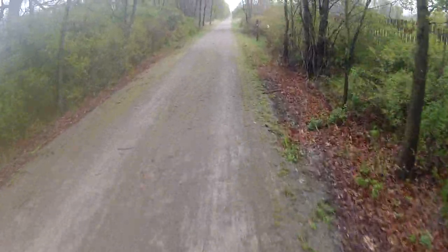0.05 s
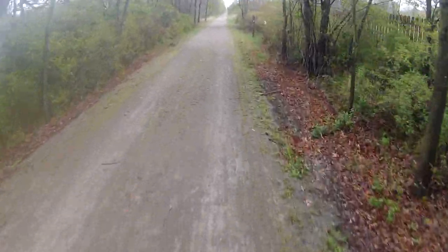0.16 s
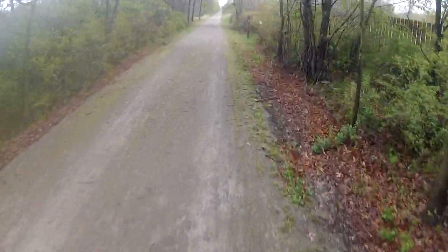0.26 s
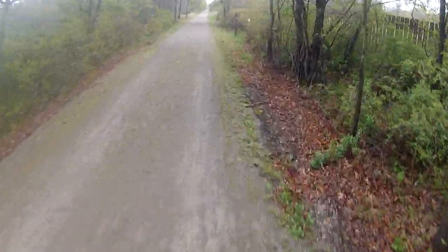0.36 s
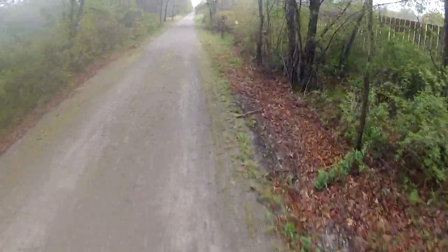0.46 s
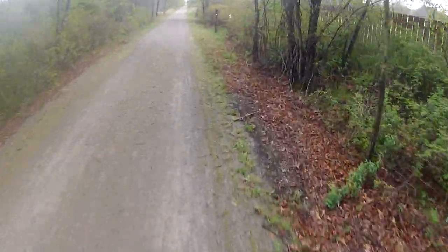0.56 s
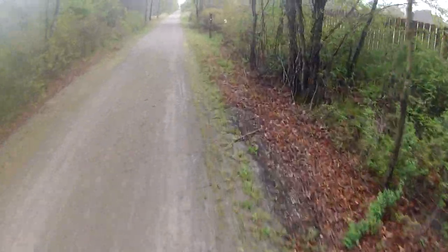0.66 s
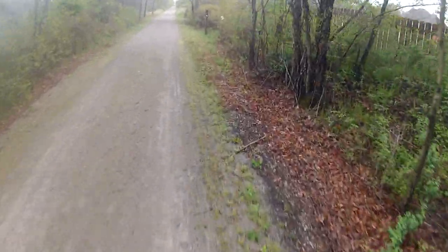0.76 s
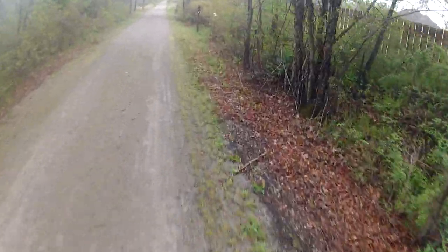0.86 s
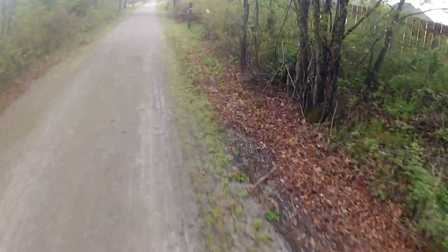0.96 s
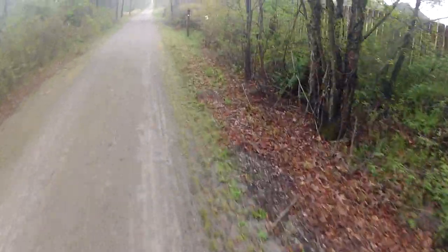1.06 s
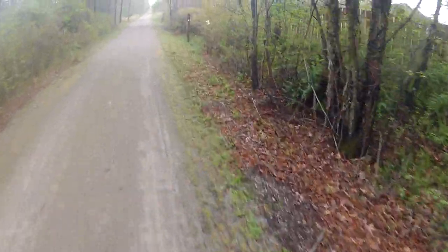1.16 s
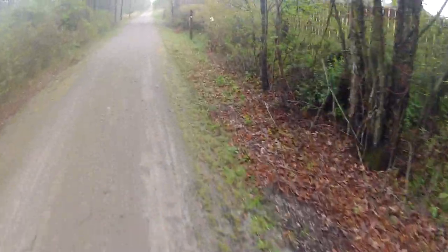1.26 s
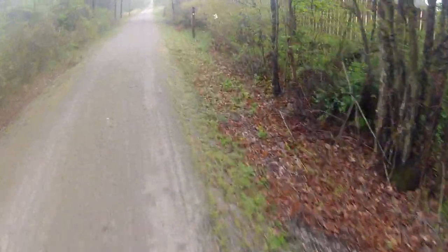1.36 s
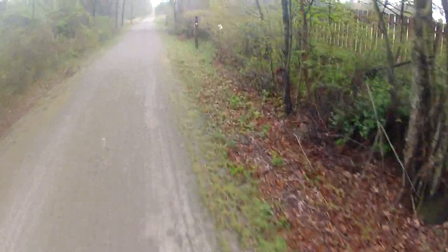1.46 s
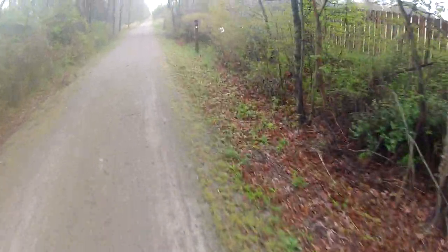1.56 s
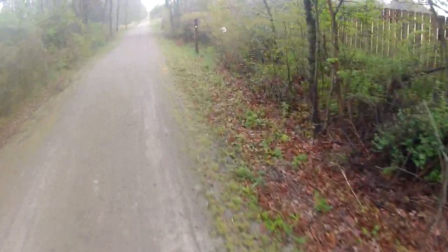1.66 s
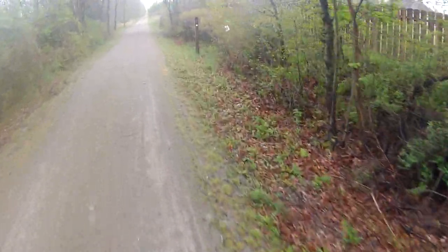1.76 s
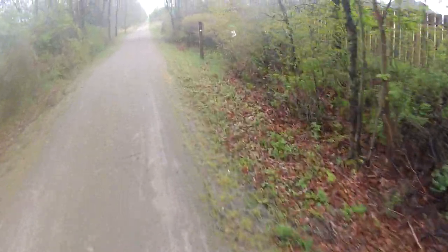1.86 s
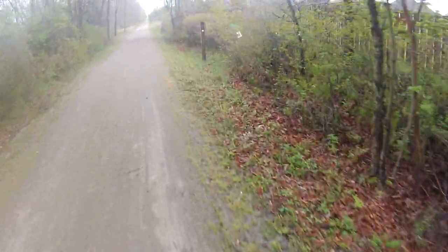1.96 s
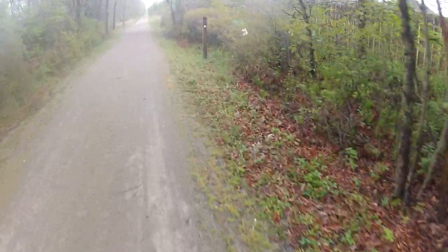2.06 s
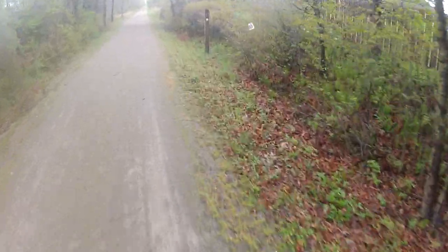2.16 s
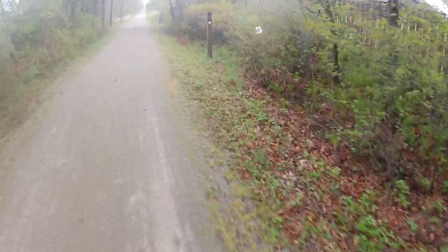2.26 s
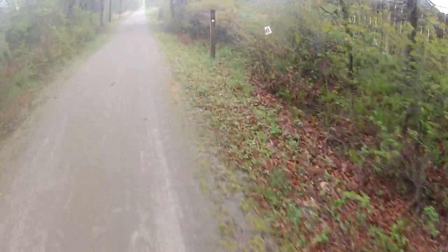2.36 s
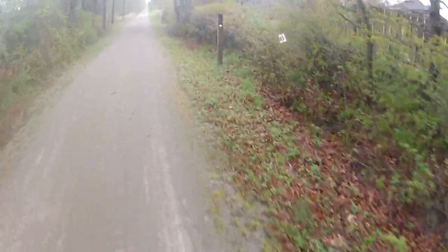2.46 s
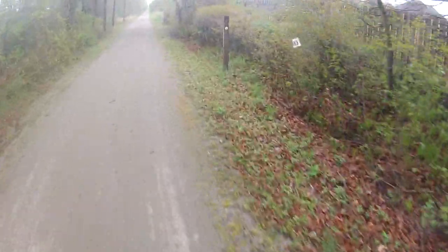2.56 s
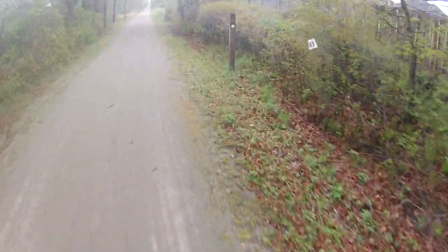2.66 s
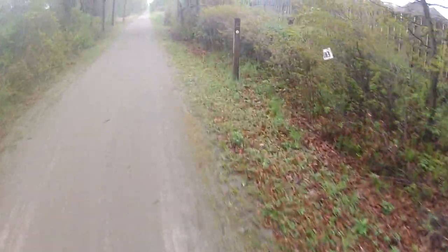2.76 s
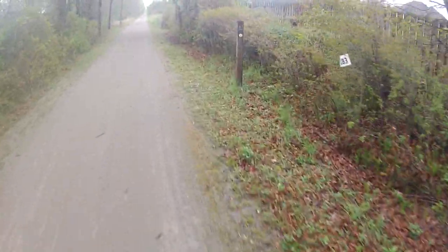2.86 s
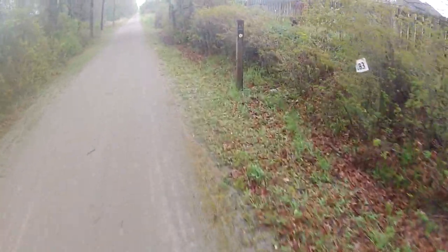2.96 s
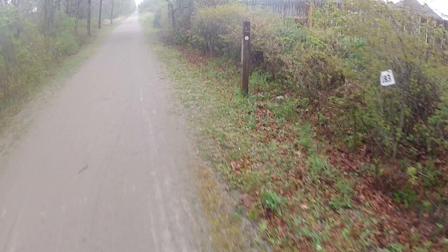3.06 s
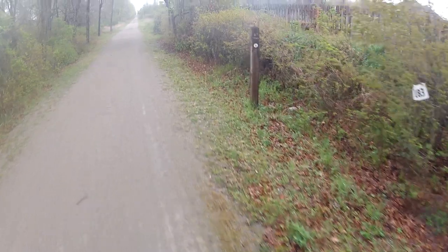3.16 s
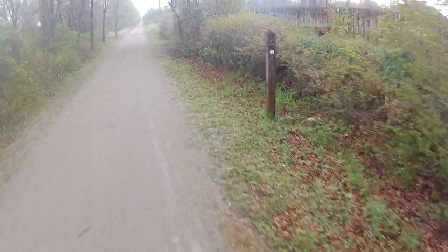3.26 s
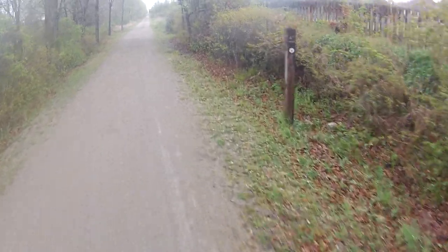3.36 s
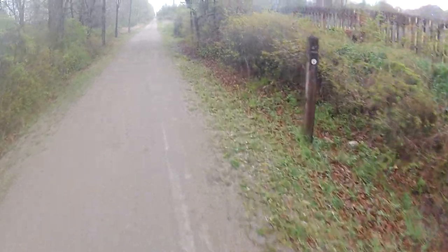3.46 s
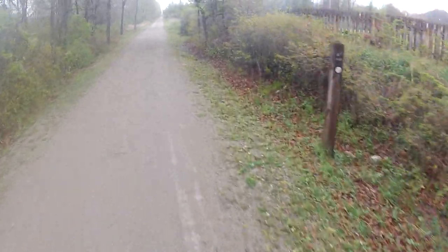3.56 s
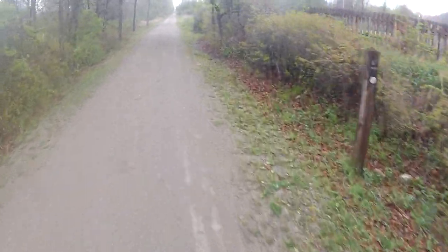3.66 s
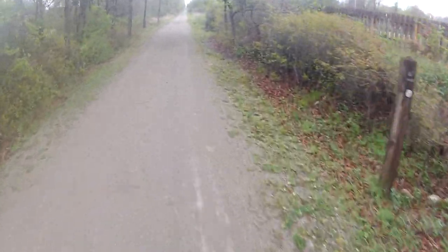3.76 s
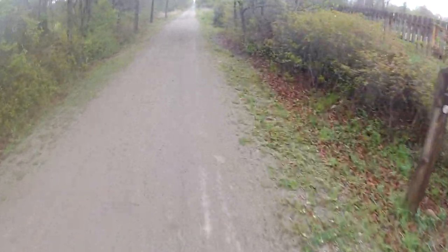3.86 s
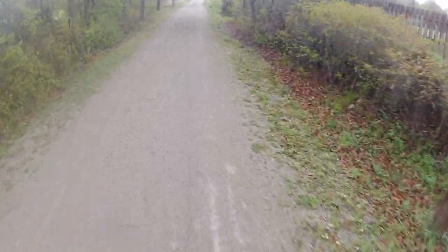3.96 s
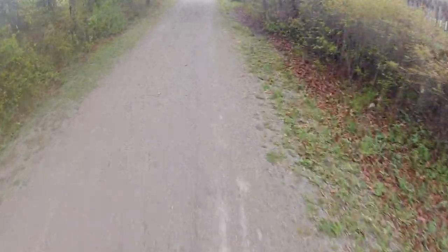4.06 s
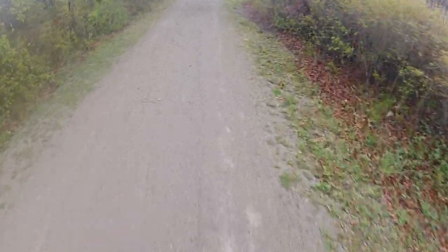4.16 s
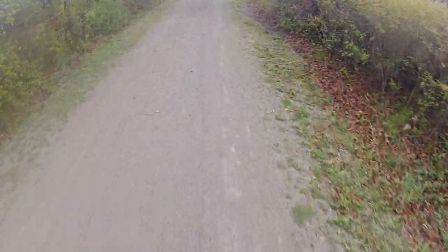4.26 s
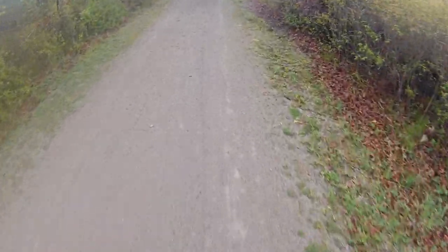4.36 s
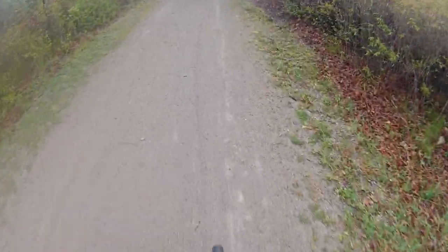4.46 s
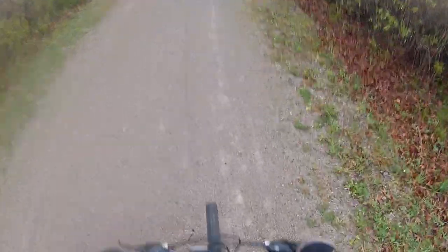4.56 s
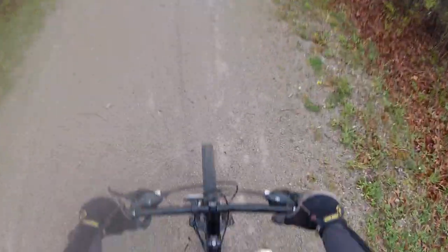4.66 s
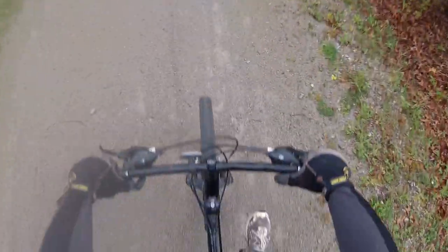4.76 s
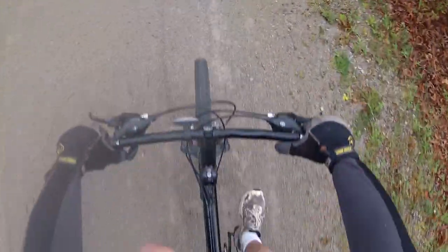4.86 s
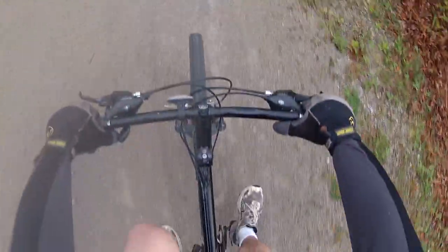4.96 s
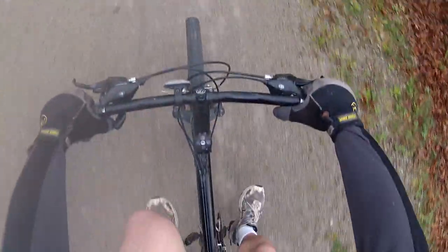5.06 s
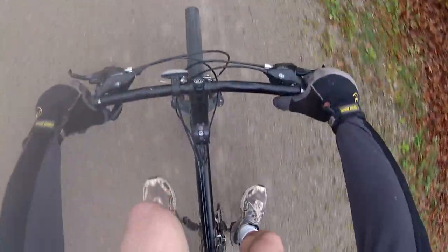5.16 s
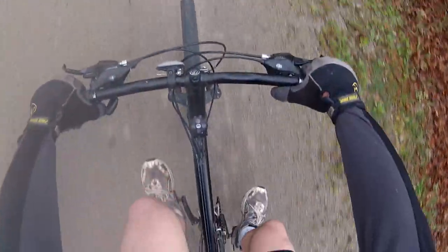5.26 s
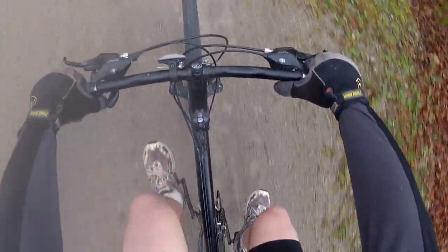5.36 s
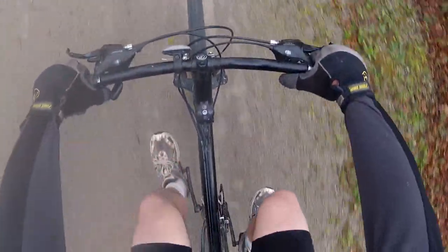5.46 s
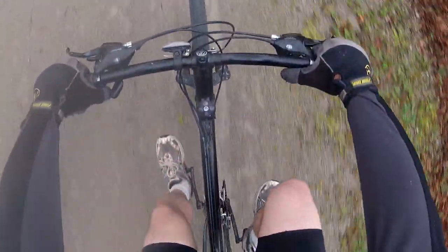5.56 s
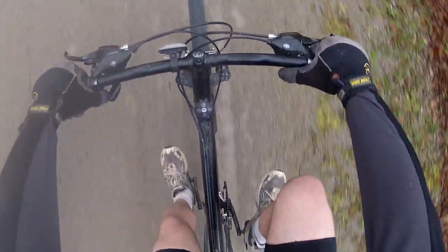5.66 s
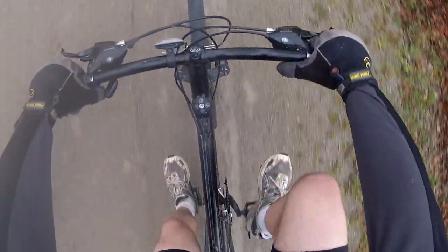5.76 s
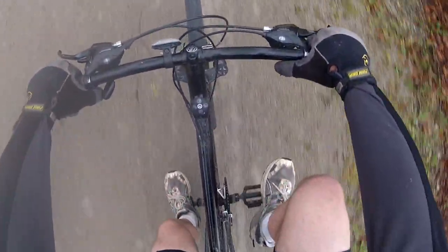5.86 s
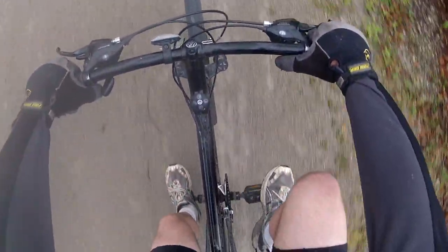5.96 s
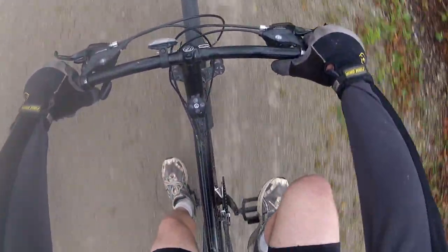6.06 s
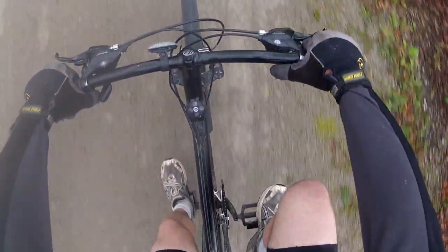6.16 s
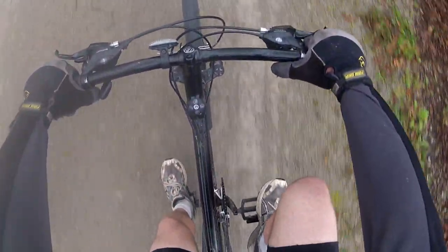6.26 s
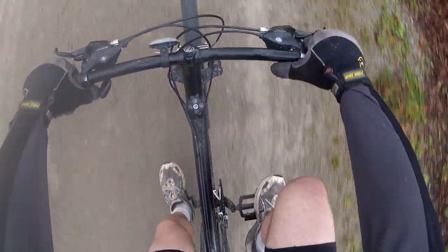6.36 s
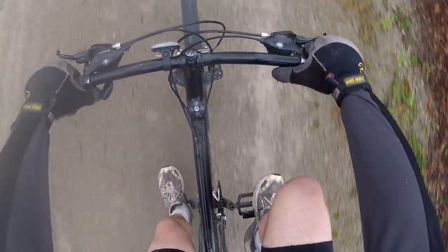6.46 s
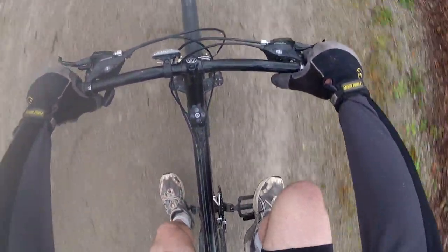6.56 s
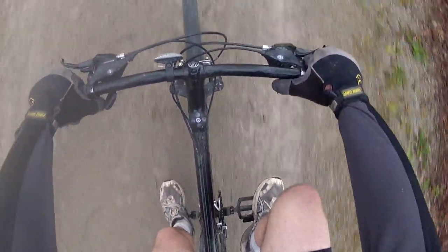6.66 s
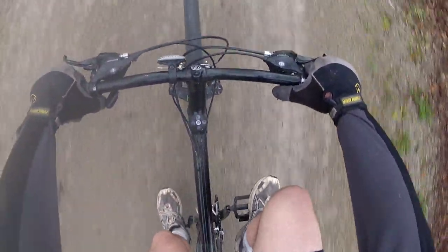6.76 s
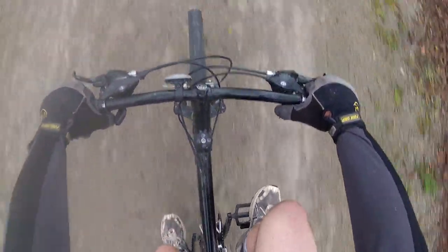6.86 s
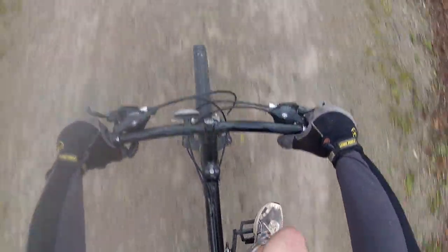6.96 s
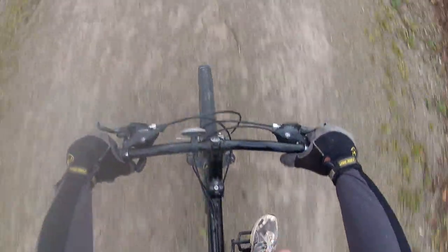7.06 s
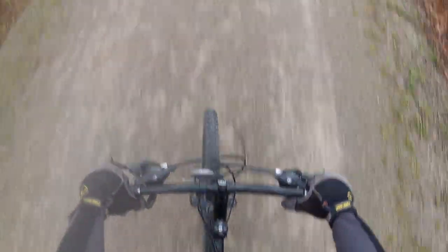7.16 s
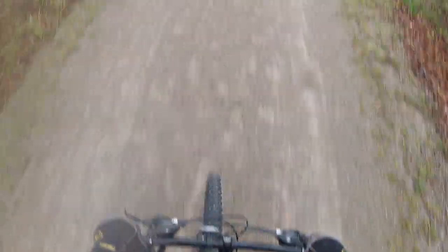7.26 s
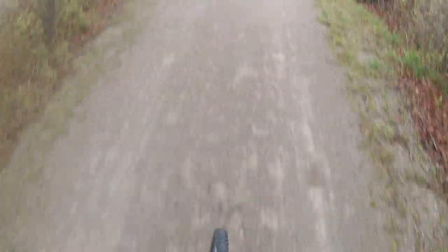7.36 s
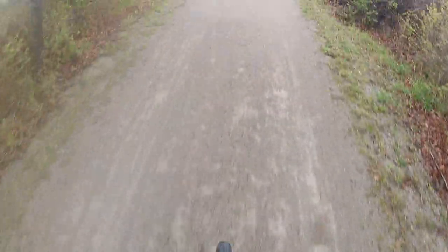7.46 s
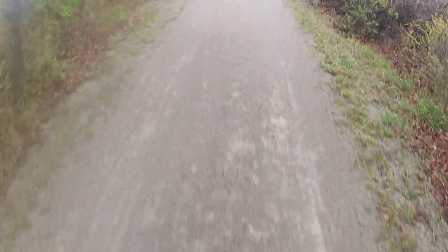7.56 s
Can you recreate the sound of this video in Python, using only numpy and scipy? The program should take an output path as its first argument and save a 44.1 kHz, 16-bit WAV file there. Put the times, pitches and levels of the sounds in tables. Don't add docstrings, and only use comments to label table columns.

```python
import sys
import numpy as np
from scipy import signal
from scipy.fft import rfft, irfft, next_fast_len
from scipy.io import wavfile
from scipy.ndimage import uniform_filter1d

SR = 44100
rng = np.random.default_rng(int(sys.argv[2]) if len(sys.argv) > 2 else 0)


def magnitude_from_level(level_db):
    exponent = np.asarray(level_db, float) / 20
    return 10 ** exponent


def wrap_up_sound(samples):
    columns = np.atleast_2d(samples).T
    tamed = np.clip(columns, -1, 1)
    steps = np.round(tamed * 32767).astype(np.int16)
    wavfile.write(sys.argv[1], SR, steps)


N = 335595

# t/s, head tilt/0-1, gravel coarseness level/dB
RIDE = [(0, 0.03, -0.5), (0.6, 0.07, 1.5), (1.6, 0.1, -1), (2.07, 0, 4.5), (2.3, 0.14, 0), (2.8, 0.16, 1),
        (3.2, 0.2, -2), (3.94, 0.17, 1), (4.38, 0.3, 0), (4.72, 0.19, 1), (5.1, 0.6, 1), (5.5, 0.67, -1.5),
        (6.0, 1, -1), (6.5, .97, 1.5), (6.77, 0.9, -0.5), (7.05, 0.82, 0.5), (7.4, 0.58, -1),
        (7.61, 0.44, 0.5)]
OPEN_AHEAD, OPEN_TILT = 0.33, 0.82
TIPS_AT_S = 4.5

# peak t/s, level/dB, length/s
GUSTS = [(0.25, -59, 0.49), (1.0, -56, 0.18), (1.303, -51, 0.13), (1.87, -55, 0.35), (2.21, -47.5, 0.2),
         (2.464, -42, 0.18), (2.75, -49, 0.35), (3.053, -49, 0.25), (3.265, -54, 0.14), (3.43, -52, 0.12),
         (3.706, -46.5, 0.12), (3.82, -55, 0.2), (4.203, -47.5, .24), (4.705, -44, 0.25),
         (4.814, -37.5, 0.086), (4.935, -38.5, 0.18), (5.05, -41.5, .12), (5.306, -44.5, 0.36),
         (5.465, -45.5, 0.13), (5.677, -43, 0.35), (5.85, -52, 0.065), (6.04, -42.5, 0.18),
         (6.27, -40, 0.36), (6.507, -40, 0.065), (6.626, -37.5, .18), (6.856, -36, 0.2),
         (6.944, -37.5, 0.11), (7.078, -37.5, 0.16), (7.219, -35.5, .2), (7.427, -43.5, 0.15)]
CALM_DB, CALM_TILT_DB = -57.5, 9.5
# f/Hz, level/dB per Hz
BUFFET_AHEAD = [(4.7, -37), (8.0, -7), (27, 3.5), (44, -3.5), (52, -4.5), (62, -10.5), (78, -28),
                (92, -36.5), (130, -36), (170, -57), (290, -120)]
# f/Hz, level/dB per Hz
BUFFET_BELOW = [(8, -15), (22, -5), (32, -1.5), (40, 2.5), (52, -6), (66, -11), (80, -26.5), (130, -30)]
# f/Hz, level/dB per Hz
WASH = [(44, -37.5), (75, 0), (86, 0.5), (123, -3.5), (232, -1.5), (335, -6.5), (362, -8.5), (431, -9),
        (600, -15.5), (780, -34), (1320, -120)]
WASH_DB = -59.5
# f/Hz, level/dB per Hz
HUM_AHEAD = [(360, -52.5), (620, -21.5), (719, -4.5), (751, -1), (941, -8), (1140, -15), (1250, -15),
             (1750, -21), (2280, -30), (3850, -120)]
# f/Hz, level/dB per Hz
HUM_BELOW = [(360, -24.5), (620, -4.5), (848, 2), (916, -2.5), (970, 2), (1120, -3.5), (1460, -15.5),
             (1600, -11.5), (1750, -15.5), (2280, -66.5), (3850, -120)]
HUM_DB, HUM_TILT_DB = -54, -17.5
HUM_LAG = 4.5

# f/Hz, level/dB per Hz
CRUNCH_AHEAD = [(1000, -32.5), (1700, -17), (1790, -4.5), (1970, 1), (2180, 3.5), (2320, -1), (2610, -10.5),
                (2880, -13), (3630, -14.5), (3950, -16.5), (4210, -16.5), (5260, -20.5), (6000, -27),
                (7800, -63), (13200, -120)]
# f/Hz, level/dB per Hz
CRUNCH_BELOW = [(650, -21.5), (1100, -14.5), (1210, -19), (1540, -8.5), (1720, -11), (1970, -5), (2140, 1),
                (2540, -14), (2930, -3.5), (3280, -7), (3550, -4), (3700, -10.5), (4650, -14), (5240, -14),
                (6000, -24.5), (7800, -72), (13200, -120)]
CRUNCH_DB = -64.5
# low f/Hz, high f/Hz
GRAIN_BANDS = [
    (900, 2260),
    (2500, 3900),
    (3800, 5900),
]

# t/s, energy level/dB, centre f/Hz, spread/octaves
STONES = [(0.4225, -46.5, 2800, 0.26), (0.6815, -51, 2750, 0.33), (1.0896, -49, 3780, 0.28),
          (1.1888, -41, 3250, 0.35), (1.2069, -46, 3060, .35), (1.5624, -47.5, 3190, 0.44),
          (1.9231, -44, 3680, 0.44), (2.524, -47, 2700, .38), (2.5562, -42, 3270, 0.23),
          (3.3112, -45.5, 2330, 0.36), (4.0201, -42.5, 2940, 0.42), (4.2806, -48.5, 2470, .3),
          (4.5346, -45, 3120, 0.41), (4.8552, -41.5, 2440, 1.1), (4.864, -49, 3400, 0.51),
          (4.964, -49.5, 1690, 0.82), (5.0752, -51, 2470, 0.59), (5.2755, -41, 2450, 0.48),
          (5.3255, -48, 4030, 0.63), (5.4424, -45, 3200, 0.27), (5.4736, -40.5, 3120, .49),
          (5.7993, -48, 3140, .35), (6.2482, -47, 3540, 0.35), (6.343, -42.5, 3150, 0.37),
          (6.423, -46, 2400, .24), (6.5729, -48, 1510, .35), (6.621, -43.5, 2270, 0.21),
          (7.136, -45.5, 3160, 0.35), (7.1759, -45.5, 2660, 0.58), (7.3181, -47, 3280, 0.66)]
# t/s, energy
# level/dB, centre f/Hz
PEBBLES = [(0.158, -55, 4720), (0.182, -52, 3810), (0.264, -52, 3210), (0.314, -59, 5310),
           (0.378, -56, 4550), (0.39, -52, 3350), (0.483, -55, 4360), (0.792, -50, 3300),
           (1.015, -49, 3200), (1.272, -51.5, 3560), (1.77, -50, 3220), (2.365, -54.5, 3830),
           (2.619, -48.5, 3560), (2.686, -54, 3490), (2.727, -51.5, 3750), (3.719, -55, 3810),
           (4.055, -50, 3470), (4.712, -51, 2350), (4.76, -53, 3630), (5.223, -58, 4110),
           (5.249, -55, 4710), (5.525, -52.5, 4900), (5.543, -50, 4660), (6.093, -51, 2840),
           (6.356, -54, 1850), (6.564, -50, 3550), (6.608, -51, 3350), (6.692, -50.5, 3960),
           (7.279, -53, 1540), (7.385, -49, 2220)]
PEBBLE_SPREAD, RATTLE_T60 = 0.28, 0.025

# t/s, f/Hz, level/dB
WHISTLES = [
    [(3.988, 4900, -84), (3.996, 5150, -74), (4.006, 5600, -74), (4.02, 5500, -72), (4.047, 5500, -74),
     (4.07, 5420, -86)],
    [(4.295, 2760, -72), (4.326, 2880, -58), (4.358, 2930, -63), (4.372, 2945, -71), (4.395, 2965, -66),
     (4.442, 2950, -72), (4.456, 2945, -62), (4.49, 2890, -70), (4.54, 2830, -80)],
]
CHIP_START_S, CHIP_EVERY_S, CHIP_S, CHIP_DB = 4.656, 0.0907, 0.022, -55.5
CHIP_LOW_HZ, CHIP_TOP_HZ = 4350, 5450

# t/s, peak level/dB, f/Hz
KNOCKS = [(4.8555, -45.5, 1420), (4.8565, -56, 900), (4.888, -49.5, 855), (4.963, -55, 1000),
          (6.356, -54.5, 1030), (6.453, -53.5, 980), (6.572, -49, 985), (6.866, -52.5, 980),
          (7.043, -55, 920), (7.28, -52.5, 830), (7.356, -54, 1030)]
KNOCK_CYCLES = 20.3

# f/Hz, level/dB per Hz
HISS = [(35, -37), (60, 2), (109, -6), (231, -2), (962, -15), (1780, -11.5), (2200, -12), (4490, -13.5),
        (5340, -17.5), (6000, -30), (7800, -68), (13200, -120)]
HISS_DB = -77.5
WHINE_HZ, WHINE_DB = 4376, -91
# f/Hz, level/dB
EDGE = [(15250, 0.5), (15350, -30), (15900, -38), (16000, -60)]


def evened(x):
    return x / np.sqrt(np.mean(x ** 2, axis=-1, keepdims=True) + 1e-20)


def read(points, hz):
    f, db = np.transpose(points)
    octave, ends = np.log2(hz + 1), np.log2(f + 1)
    outside = np.maximum(ends[0] - octave, 0) + np.maximum(octave - ends[-1], 0)
    return np.interp(octave, ends, db) - 40 * outside


def along(rows):
    s, *columns = np.transpose(rows)
    return [np.interp(np.arange(N) / SR, s, c) for c in columns]


def causal(db):
    cepstrum = irfft(np.log(magnitude_from_level(np.maximum(db - db.max(), -90))))
    half = len(cepstrum) // 2
    cepstrum[1:half] *= 2
    cepstrum[half + 1:] = 0
    return irfft(np.exp(rfft(cepstrum)))[:half]


def coloured(x, points, size=8192):
    taps = causal(read(points, np.fft.rfftfreq(size, 1 / SR)))
    return evened(signal.oaconvolve(x, taps)[:N])


def turned(x, ahead, below, lag, size=8192):
    tilt = along(RIDE)[0]
    share = np.clip(OPEN_AHEAD + OPEN_TILT * tilt, 0, 1) ** lag
    return (1 - share) * coloured(x, ahead, size) + share * coloured(x, below, size)


def smoothed(x, span):
    return uniform_filter1d(uniform_filter1d(x, span), span)


def drift(seconds):
    return evened(smoothed(rng.standard_normal(N), max(round(seconds * SR), 2)))


def add(mix, s, sound):
    part = mix[round(s * SR):][:len(sound)]
    part += sound[:len(part)]


def gusts():
    power = magnitude_from_level(2 * (CALM_DB + CALM_TILT_DB * along(RIDE)[0]))
    for s, db, length in GUSTS:
        add(power, s - length / 2, magnitude_from_level(2 * db) * np.hanning(round(length * SR)))
    return np.sqrt(power)


def buffeting():
    noise = rng.standard_normal(N)
    eddies = evened(turned(noise, BUFFET_AHEAD, BUFFET_BELOW, lag=1.0, size=32768))
    swing = np.sqrt(smoothed(eddies ** 2, 1500) + 0.05)
    steady = evened(eddies / swing ** 0.9)
    low_pass = signal.butter(3, 85, fs=SR, output="sos")
    return signal.sosfiltfilt(low_pass, gusts() * steady)


def wind():
    tilt = along(RIDE)[0]
    wash_db = WASH_DB - 1.7 * tilt + 0.11 * drift(0.028)
    wash = magnitude_from_level(wash_db) * coloured(rng.standard_normal(N), WASH)
    hum_db = HUM_DB + HUM_TILT_DB * tilt + 0.9 * drift(0.016)
    hum = magnitude_from_level(hum_db) * turned(rng.standard_normal(N), HUM_AHEAD, HUM_BELOW, HUM_LAG)
    return buffeting() + wash + hum


def grit(per_s, spread_db, t60):
    struck = rng.random(N) < per_s / SR
    sizes = magnitude_from_level(spread_db * np.minimum(rng.exponential(1, N), 2.7)) * struck
    decay = magnitude_from_level(-60 * np.arange(1500) / SR / t60)
    return evened(signal.oaconvolve(sizes, decay)[:N] * rng.standard_normal(N))


def tyres():
    shared_db = 1.02 * drift(0.03)
    drive = np.zeros(N)
    for edges in GRAIN_BANDS:
        band = signal.butter(2, edges, "bandpass", fs=SR, output="sos")
        rolling_db = shared_db + 0.5 * drift(0.046) + 0.82 * drift(0.24)
        rolling = magnitude_from_level(rolling_db) * rng.standard_normal(N)
        snaps = magnitude_from_level(-5 + 1.05 * shared_db) * grit(per_s=160, spread_db=4.7, t60=0.0097)
        drive += signal.sosfilt(band, rolling + snaps)
    coarseness_db = along(RIDE)[1]
    return magnitude_from_level(CRUNCH_DB + coarseness_db) * turned(drive, CRUNCH_AHEAD, CRUNCH_BELOW, lag=1.08)


def stones():
    out = np.zeros(N)
    hz, t = np.fft.rfftfreq(2048, 1 / SR), np.arange(2048) / SR
    rows = list(STONES) + [(*row, PEBBLE_SPREAD) for row in PEBBLES]
    for s, db, centre_hz, spread in rows:
        rattle = rng.standard_normal(2048) * magnitude_from_level(-60 * t / RATTLE_T60)
        rattle[0] += 4
        bell_db = -2.5 * (np.log2((hz + 1) / centre_hz) / max(spread, 0.1)) ** 2
        case = CRUNCH_BELOW if s > TIPS_AT_S else CRUNCH_AHEAD
        tick = signal.fftconvolve(rattle, causal(1.11 * read(case, hz) + bell_db))
        add(out, s, magnitude_from_level(db + 14) * tick / np.linalg.norm(tick))
    return out


def whistle(rows):
    s, hz, db = np.transpose(rows)
    t = np.arange(s[0], s[-1], 1 / SR)
    tone = np.sqrt(2) * np.sin(2 * np.pi * np.cumsum(np.interp(t, s, hz)) / SR)
    return magnitude_from_level(np.interp(t, s, db)) * tone * signal.windows.tukey(len(t), 0.15)


def chip():
    u = np.arange(0, 1, 1 / (SR * CHIP_S))
    hz = CHIP_LOW_HZ + (CHIP_TOP_HZ - CHIP_LOW_HZ) * np.sin(1.3 * np.pi * u)
    swell = magnitude_from_level(CHIP_DB - 5 - 18 * u) * signal.windows.tukey(len(u), 0.3)
    hoarseness = 1 + 0.6 * evened(uniform_filter1d(rng.standard_normal(len(u)), 40))
    return swell * hoarseness * np.sin(2 * np.pi * np.cumsum(hz) / SR)


def bird():
    out = np.zeros(N)
    for rows in WHISTLES:
        add(out, rows[0][0], whistle(rows))
    for s in CHIP_START_S + CHIP_EVERY_S * np.arange(5):
        add(out, s - 0.002, chip())
    echoes = rng.standard_normal(3000) * magnitude_from_level(-60 * np.arange(3000) / SR / 0.16)
    return out + magnitude_from_level(-11) * signal.oaconvolve(out, echoes / np.linalg.norm(echoes))[:N]


def knocks():
    out, t = np.zeros(N), np.arange(4096) / SR
    for s, db, hz in KNOCKS:
        ring = np.sin(2 * np.pi * hz * t) + 0.36 * np.sin(2 * np.pi * 1.475 * hz * t)
        onset = 1 - np.exp(-t / 0.00032)
        add(out, s, magnitude_from_level(db + 5.5 - 60 * t * hz / KNOCK_CYCLES) * ring * onset)
    return out


def scene():
    mono = wind() + tyres() + stones() + bird() + knocks()
    return np.array([mono, mono])


def held_fourfold(wired):
    blocks = next_fast_len(N // 147 + 1)
    hz = np.fft.rfftfreq(147 * blocks, 1 / SR)
    lifted = rfft(wired, 147 * blocks) / np.sinc(np.minimum(hz, 6000) / 12000)
    slow = irfft(lifted[:, :20 * blocks + 1])
    held = rfft(np.repeat(slow, 4, axis=1))[:, :len(hz)] / 4
    edge_db = np.interp(hz, *np.transpose(EDGE))
    return irfft(held * magnitude_from_level(edge_db), 147 * blocks)[:, :N]


def top_cut(x):
    return signal.sosfilt(signal.butter(12, 15890, fs=SR, output="sos"), x)


def record(dry):
    hiss = magnitude_from_level(HISS_DB) * coloured(rng.standard_normal(N), HISS)
    whine = magnitude_from_level(WHINE_DB) * np.sin(2 * np.pi * WHINE_HZ * np.arange(N) / SR)
    wired = dry + whine + hiss * np.array([[1], [-1]])
    return top_cut(held_fourfold(wired))


dry = scene()
out = record(dry)
wrap_up_sound(out)
```